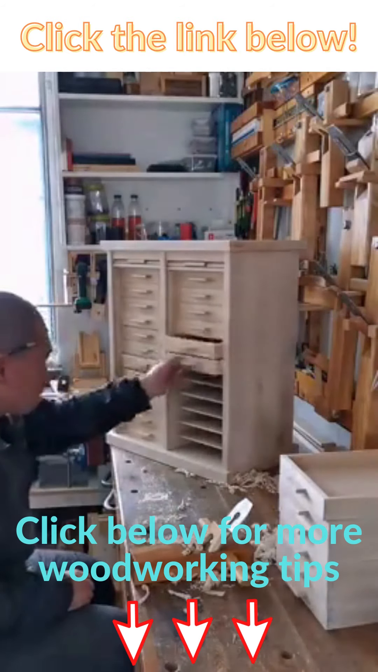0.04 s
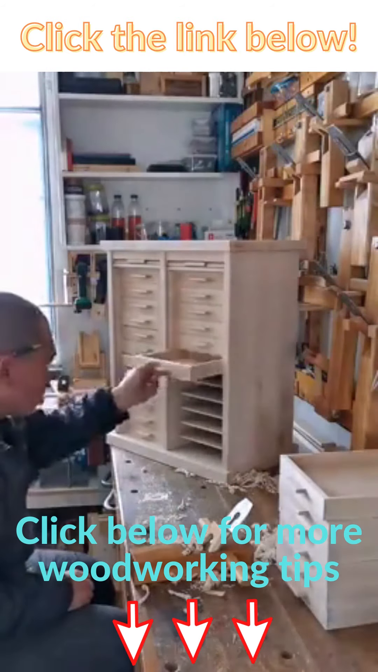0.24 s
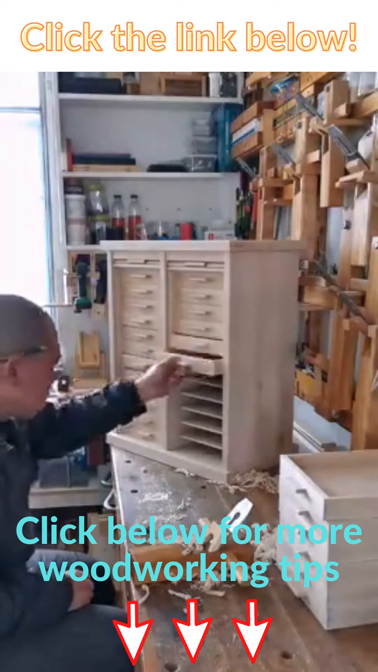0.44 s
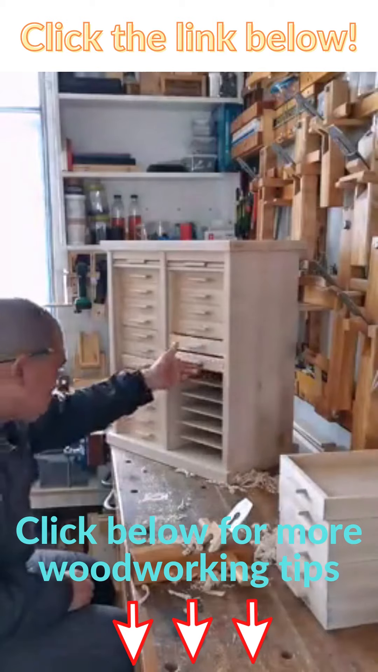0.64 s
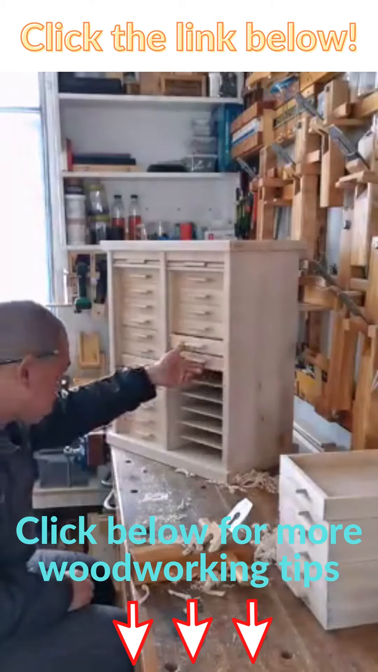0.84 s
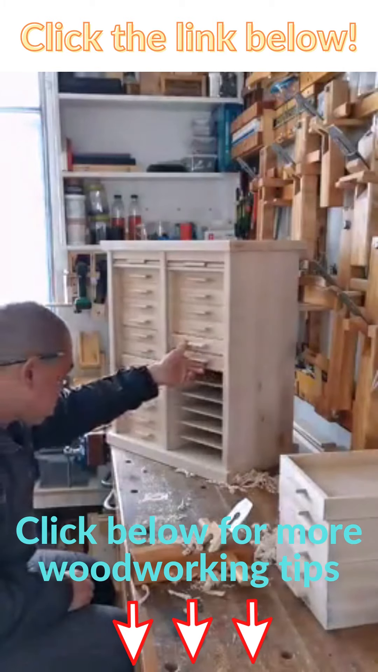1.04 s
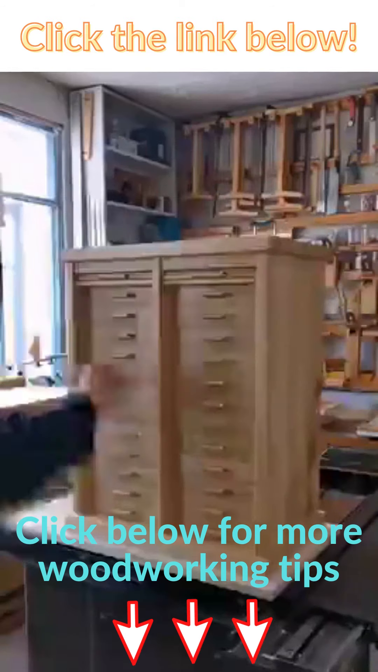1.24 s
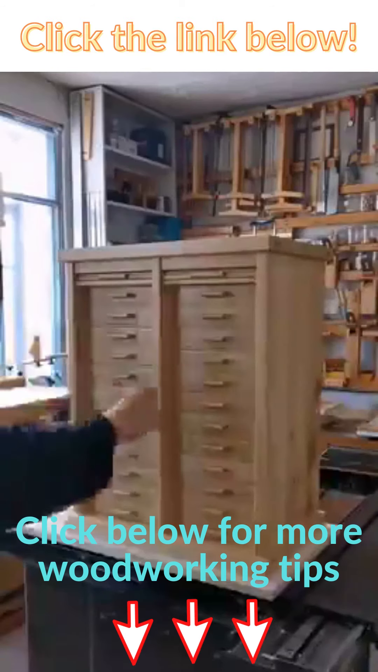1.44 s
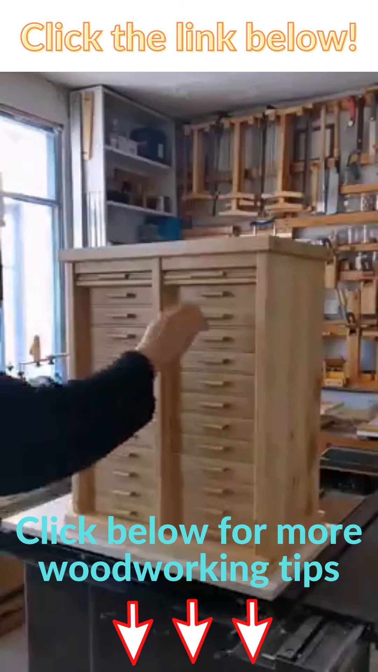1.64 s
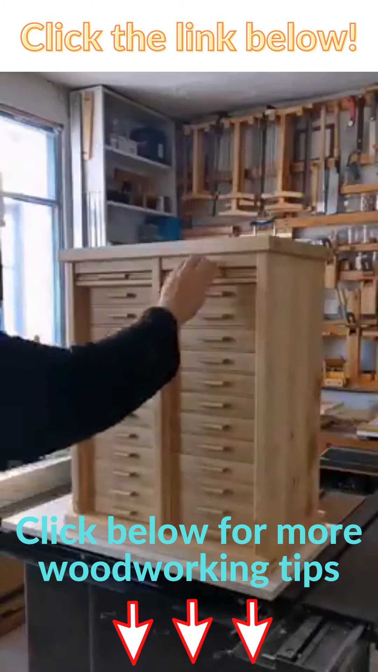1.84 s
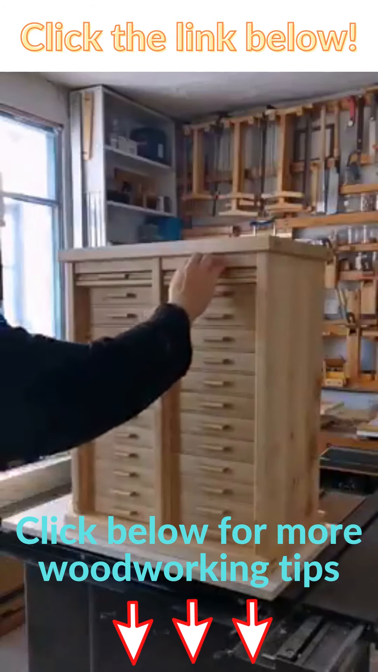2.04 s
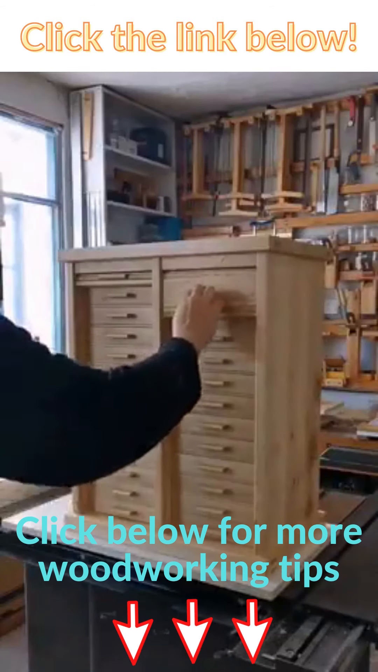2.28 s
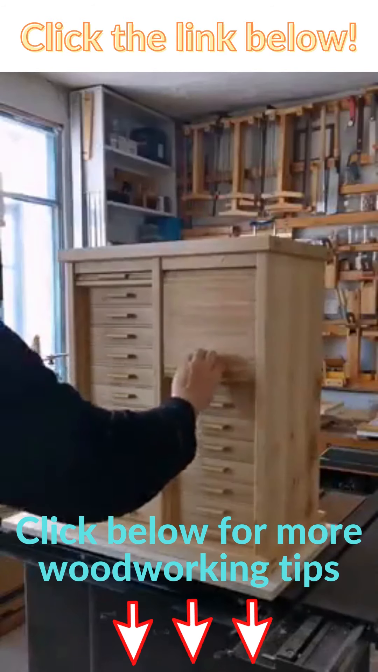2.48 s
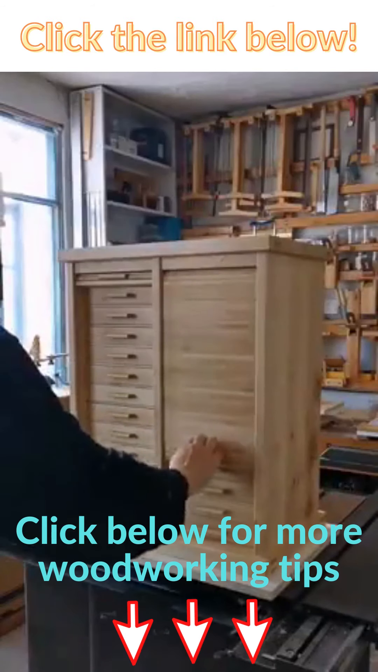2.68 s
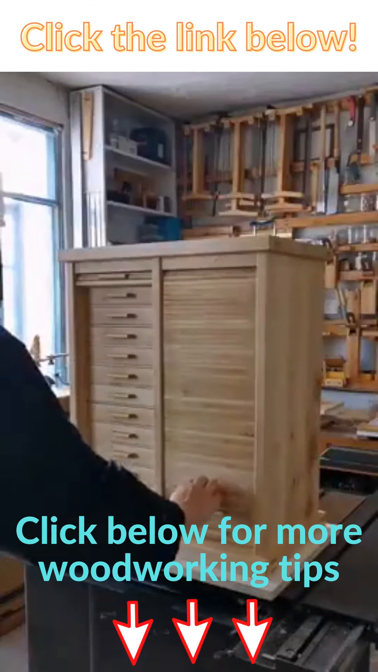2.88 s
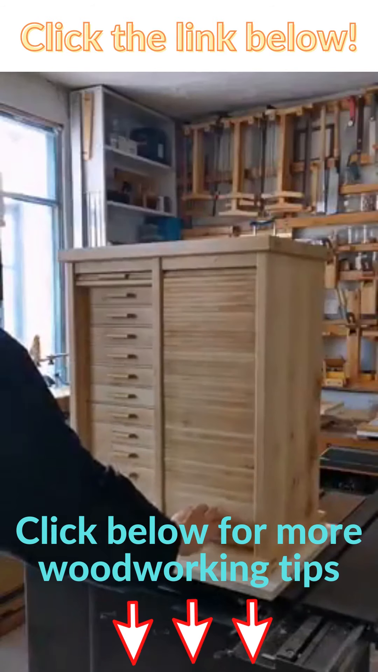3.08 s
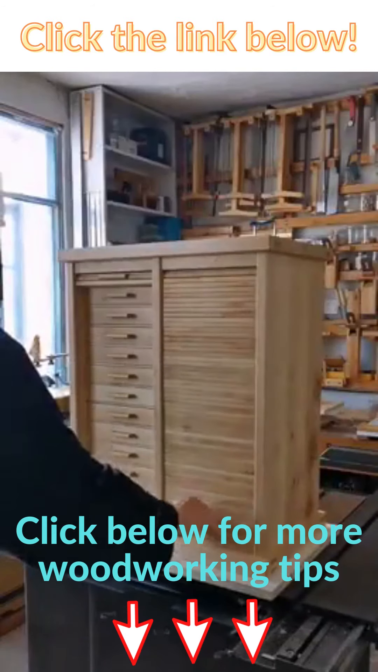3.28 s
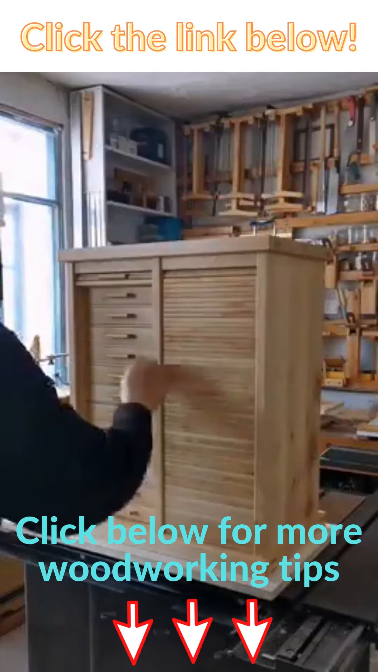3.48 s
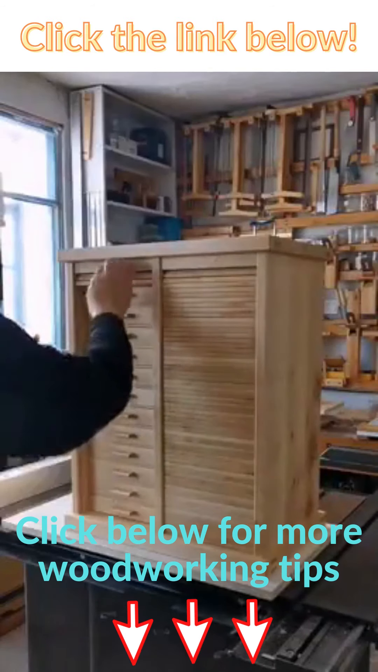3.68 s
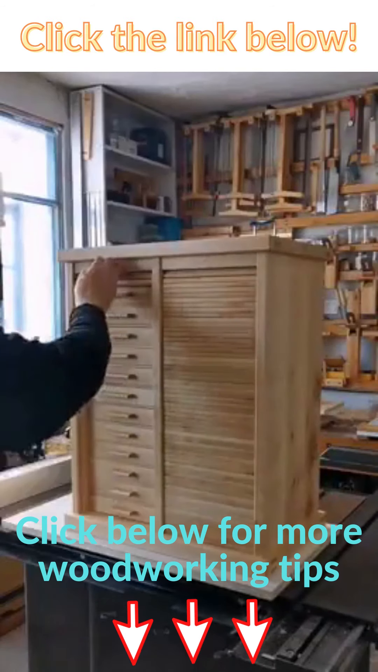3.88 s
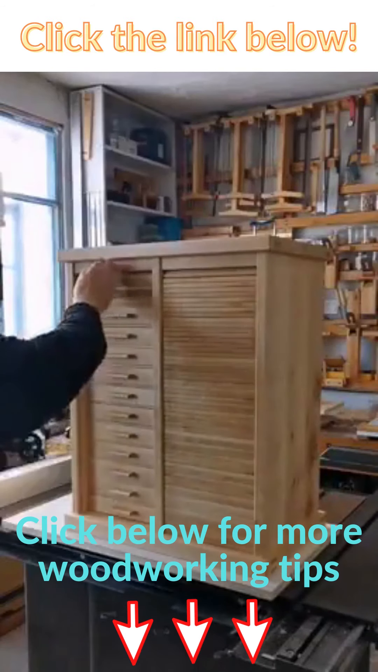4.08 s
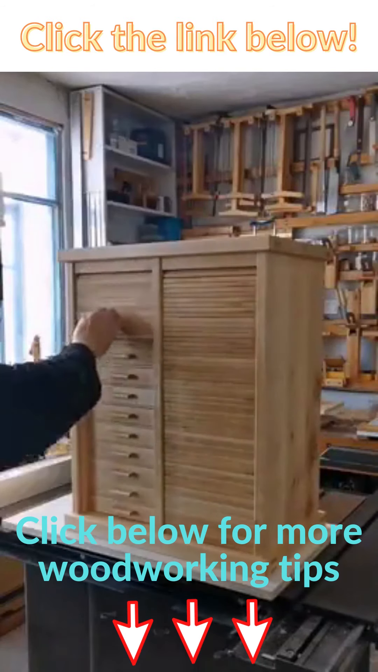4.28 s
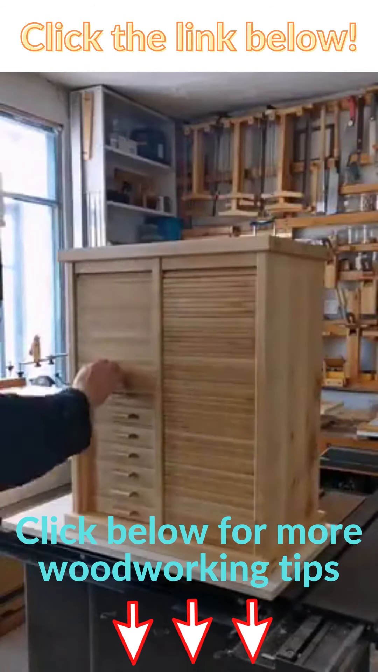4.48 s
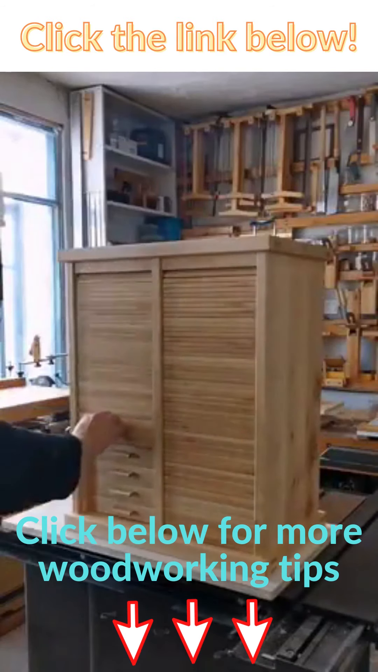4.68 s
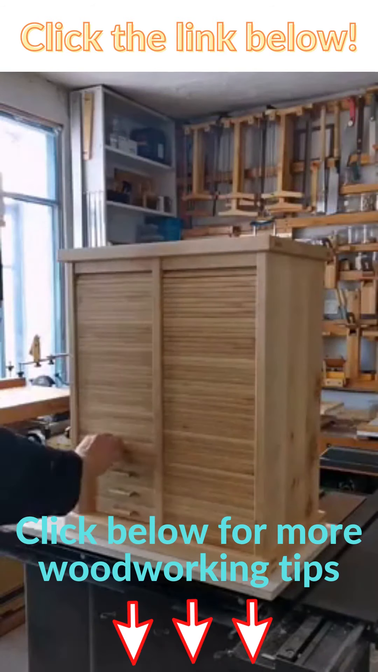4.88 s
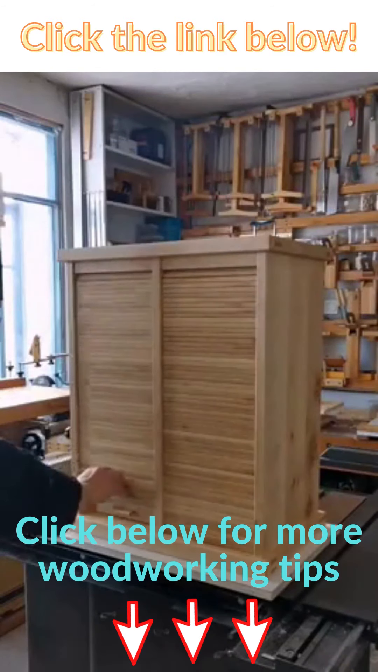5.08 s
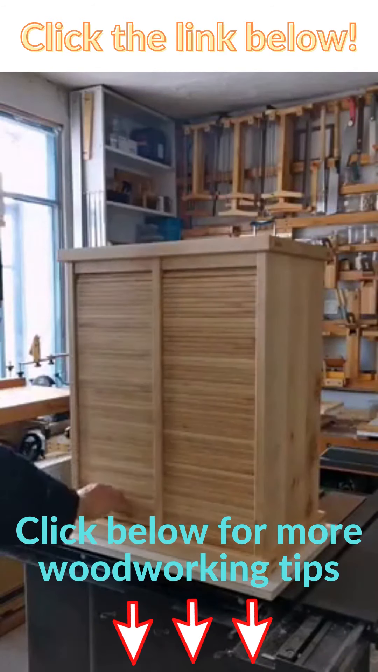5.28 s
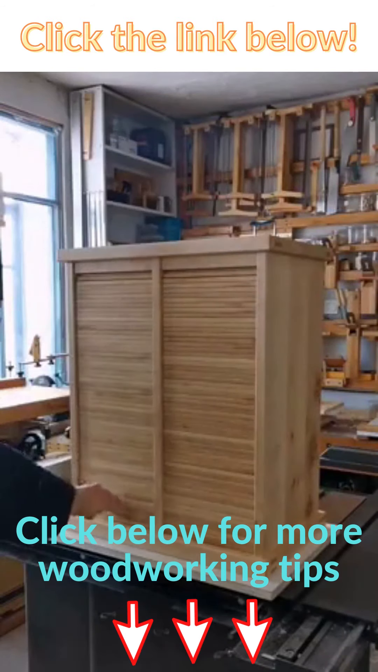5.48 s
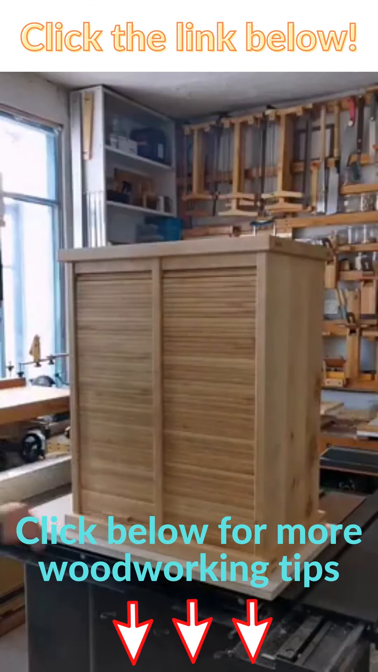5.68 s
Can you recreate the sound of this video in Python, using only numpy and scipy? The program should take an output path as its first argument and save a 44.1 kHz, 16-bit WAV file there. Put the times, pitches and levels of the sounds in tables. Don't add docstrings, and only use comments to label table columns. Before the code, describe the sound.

A small wooden tray scrapes in and knocks home, then two slatted wooden shutters rattle down their grooves, each ending in a clack.

```python
import sys
import numpy as np
from scipy import signal
from scipy.fft import rfft, irfft, next_fast_len
from scipy.io import wavfile
from scipy.ndimage import uniform_filter1d

SR = 44100
rng = np.random.default_rng(int(sys.argv[2]) if len(sys.argv) > 2 else 0)


def field_ratio(decibels):
    return 10 ** (np.asarray(decibels, dtype=float) / 20)


def to_wav(s):
    ch = np.atleast_2d(s).T
    pcm = np.round(np.clip(ch, -1, 1) * 32767)
    wavfile.write(sys.argv[1], SR, pcm.astype(np.int16))


N = 252693
FULL_SPEED_DB = -22
BOX_LOW_HZ = 112

# frequency in Hz, width in Hz, level in dB.
BOX_MODES = [(152.8, 68, 0.5), (200, 60.2, 2.5), (250, 61, -3), (315, 73, -7)]
PANEL_MODES = [(412, 76, -1.5), (531, 96, -3), (660, 130, -5), (830, 180, -6), (970, 66, -2),
               (1150, 200, -6)]
TRAY_MODES = [(400, 44, 2), (560, 80, -0.5), (720, 94, 0), (900, 88, -0.5), (1010, 70, -2), (1180, 200, -6)]
# frequency in Hz, level in dB per Hz.
RASP_SPECTRUM = [(700, -13.5), (1200, -5), (1500, 0.5), (2300, -1), (3300, -1), (3900, -9), (4600, -46)]
HISS_SPECTRUM = [(2240, -24.5), (3800, -8.5), (4700, -9), (5100, -7.5), (6810, -2.5), (7440, -5.5),
                 (7900, -17), (10600, -23.5), (11600, -28), (13000, -24.5), (15600, -46)]


def strokes():
    boom_db, knock_db, rasp_db, hiss_db = motion()
    boom = field_ratio(boom_db) * friction(150, spread_db=10.5, smooth=1.0, response=modes(BOX_MODES))
    tray_boom = filtered(boom, above(190))
    box_boom = filtered(boom, above(BOX_LOW_HZ))
    boom = np.where(first_take(), tray_boom, box_boom) * field_ratio(3.5)
    tray = friction(250, spread_db=14.0, smooth=0.91, response=modes(TRAY_MODES))
    slats = friction(250, spread_db=11.5, smooth=1.0, response=modes(PANEL_MODES))
    knock = field_ratio(knock_db) * np.where(first_take(), tray, slats)
    rasp = field_ratio(rasp_db) * friction(600, spread_db=11.5, smooth=1.0, response=shape(RASP_SPECTRUM))
    hiss = field_ratio(hiss_db) * friction(1500, spread_db=4.5, smooth=1.0, response=shape(HISS_SPECTRUM))
    near = shifting(boom + knock + rasp + hiss, depth_db=2.12)
    shop = signal.fftconvolve(near, spread(*tail(.4, 1)), axes=1)[:, :N]
    return near + field_ratio(-9.5) * shop


# time in seconds, speed as rasp level in dB, weight on the runners in dB.
TRAY_OUT = [
    (0.0, -28, -5.5),
    (0.074, -33, 2.5),
    (0.136, -27, -9),
    (0.19, -31, -9),
    (0.245, -42.5, 12),
]
TRAY_IN = [
    (0.262, -41, 13),
    (0.269, -32, 1.5),
    (0.376, -29.5, 0),
    (0.422, -29, 9.5),
    (0.55, -43, 12.5),
]
TRAY_SEATS = [
    (0.57, -38, 2),
    (0.608, -40, 1.5),
    (0.99, -53, 4.5),
    (1.106, -47.5, -0.5),
    (1.178, -45, -1),
    (1.201, -45, 5),
]
# time in seconds, speed as rasp level in dB, weight in the grooves in dB.
RIGHT_RUN = [
    (2.329, -40, -36),
    (2.346, -47.5, -5),
    (2.389, -34, -4.5),
    (2.514, -24, -11),
    (2.564, -21.5, -6.5),
    (2.848, -20, -2.5),
    (2.912, -23.5, 3),
    (3.06, -37, 3),
]
RIGHT_CREEP = [
    (3.09, -38.5, -0.5),
    (3.174, -35.5, -2.5),
    (3.278, -36.5, 6),
    (3.367, -40.5, 5.5),
]
LEFT_RUN = [
    (4.31, -46.5, -21),
    (4.339, -37.5, -11),
    (4.348, -30, -13.5),
    (4.474, -24, -6.5),
    (4.626, -25.5, -1.5),
    (4.636, -26.5, -1.5),
    (4.844, -27, 2.5),
    (4.878, -35, 8.5),
    (4.96, -39.5, -2.5),
]
LEFT_CREEP = [
    (5.0, -39.5, -2.5),
    (5.054, -39, -2.5),
    (5.15, -38, 5),
    (5.31, -37.5, 1),
    (5.564, -50, 0),
    (5.57, -43, -0.5),
]
# start in seconds, end in seconds.
RUNS = [
    (2.45, 3.1),
    (4.35, 5.8),
]


def motion():
    tray = TRAY_OUT + TRAY_IN + TRAY_SEATS
    speed_db, weight_db = curves([tray, RIGHT_RUN + RIGHT_CREEP, LEFT_RUN + LEFT_CREEP])
    t = np.arange(N) / SR
    slats_out_db, let_go_s = 3.5, 0.0098
    out = sum(np.interp(t, [a - let_go_s, a, b, b + let_go_s], [-0.0013, 0.18, 0.77, 0.25]) for a, b in RUNS)
    load_db = speed_db + np.maximum(weight_db, -40)
    boom_db = load_db - 4.5 - .5 * slats_out_db * out
    rattle_db = load_db + np.where(first_take(), -5.5, -6.5) + slats_out_db * out
    rasp_db = speed_db - 2.5
    hiss_grows = 1
    hiss_db = FULL_SPEED_DB + hiss_grows * (speed_db - FULL_SPEED_DB) - 3.5
    return boom_db, rattle_db, rasp_db, hiss_db


# time in seconds, peak in dB, pitch in Hz.
BUMPS = [(0.086, -20, 228), (0.129, -18.5, 200.0), (0.229, -25, 246), (0.272, -28, 208), (0.296, -23, 219),
         (0.388, -14.5, 226), (0.424, -21, 300.0), (0.451, -30, 250.0), (0.513, -43, 315),
         (0.527, -44, 288), (0.558, -36, 266), (0.572, -24, 228), (0.72, -24.5, 217), (1.085, -31.5, 200),
         (2.43, -30.5, 280), (2.451, -40, 240.0), (2.565, -13.5, 310.1), (2.579, -11, 235),
         (2.625, -10, 218), (2.677, -17, 208), (2.73, -14, 237), (2.761, -22, 190.0), (2.793, -22, 258),
         (2.831, -17.5, 232), (2.886, -21, 223), (2.907, -9, 228), (2.934, -9, 247), (3.038, -17.5, 234),
         (3.121, -31, 190.0), (3.211, -28, 310.0), (3.245, -43, 230.0), (3.28, -30, 295),
         (3.318, -21.5, 300), (4.37, -24, 242), (4.392, -24, 270), (4.422, -22, 190.0), (4.475, -23.5, 237),
         (4.496, -22, 232), (4.51, -27, 206), (4.633, -19, 200.0), (4.646, -18.5, 279), (4.664, -18, 171),
         (4.708, -22.5, 202), (4.767, -14, 220), (4.781, -14.5, 184), (4.845, -21, 323), (4.86, -32, 212),
         (4.874, -14.5, 194), (4.928, -26, 182), (4.995, -26.5, 193), (5.086, -23, 316),
         (5.105, -21.5, 224), (5.128, -24, 255), (5.152, -21, 248), (5.165, -18.5, 201),
         (5.275, -24.5, 245), (5.333, -27, 280), (5.358, -39, 280.0), (5.432, -28, 310), (5.466, -42, 337)]
# time in seconds, peak in dB, pitch in Hz.
TICKS = [(0.061, -26, 895), (0.087, -16.5, 650), (0.109, -18.5, 720), (0.136, -21, 820), (0.161, -22, 750),
         (0.27, -17, 1110), (0.284, -16.5, 1010.0), (0.409, -17, 910), (0.421, -8.5, 930.0),
         (0.437, -28, 860), (0.463, -18, 854), (0.486, -15, 760.0), (0.508, -18.5, 720), (0.524, -18, 790),
         (0.556, -19.5, 810), (0.651, -27, 590), (0.662, -28, 760), (0.72, -23.5, 794), (0.743, -28, 680),
         (2.429, -28, 1050), (2.547, -24, 1150), (2.569, -27, 1050), (2.596, -35, 1010.0),
         (2.616, -14, 1210.0), (2.655, -18, 1090), (2.673, -9, 970), (2.688, -12, 906), (2.774, -25, 830.0),
         (2.783, -16, 740), (2.805, -10.5, 620), (2.869, -10.5, 910), (2.883, -24, 696), (2.9, -28, 710),
         (3.002, -23, 764), (3.102, -25, 1270), (3.177, -27, 1150), (3.199, -28, 680), (3.236, -43, 1010.0),
         (3.246, -20.5, 1180), (3.297, -23, 1200), (4.361, -37, 745), (4.384, -36, 810), (4.427, -34, 1130),
         (4.477, -39, 950), (4.487, -20, 1060), (4.515, -16, 1060), (4.59, -11, 1130), (4.6, -17, 1060),
         (4.658, -19, 890), (4.668, -17, 970), (4.813, -14, 830), (4.837, -18, 630), (5.118, -30, 750),
         (5.171, -41, 660), (5.207, -28, 670), (5.304, -26, 830), (5.342, -40, 720.0), (5.355, -27, 830.0),
         (5.433, -31, 585), (5.467, -30.5, 487)]
# time in seconds, peak in dB, pitch in Hz.
CLICKS = [(0.036, -28.5, 2430.0), (0.113, -18, 2420), (0.127, -20, 2450), (0.134, -20, 2420),
          (0.151, -30.5, 2640), (0.158, -33, 2440.0), (0.21, -18, 2600), (0.268, -14, 2100),
          (0.281, -14, 2090), (0.288, -29.5, 2250.0), (0.335, -22, 2330), (0.411, -12, 2290),
          (0.425, -21, 2020), (0.431, -28, 2220.0), (0.438, -28, 2030), (0.459, -20, 2050.0),
          (0.525, -32, 2320), (2.178, -42, 1940), (2.186, -24, 1870), (2.193, -42, 2220.0),
          (2.2, -39, 2090), (2.264, -26, 2480.0), (2.503, -10, 2550.0), (2.525, -15, 2290),
          (2.534, -14, 2570), (2.543, -18, 2240.0), (2.564, -17, 2670), (2.645, -30, 2200),
          (2.659, -29, 2290.0), (2.702, -21, 2370.0), (2.768, -25, 2640.0), (2.846, -10, 2380.0),
          (2.867, -22, 2440), (2.933, -11, 2500), (2.987, -32, 2180), (3.122, -37, 2120.0),
          (3.274, -41, 2300.0), (3.282, -33, 2030), (3.982, -37, 2780.0), (3.992, -42, 2620.0),
          (4.005, -38, 2080), (4.046, -35, 2250), (4.185, -42, 2630), (4.217, -49.5, 2210),
          (4.347, -17, 2910), (4.359, -11, 2700), (4.371, -17, 2620), (4.489, -14, 2650),
          (4.515, -20.5, 2360), (4.525, -20, 2520), (4.574, -27, 2440), (4.583, -27, 2440),
          (4.617, -13, 2500), (4.668, -29, 2480), (4.703, -27, 2630), (4.753, -24, 2520),
          (4.783, -17, 2620), (4.831, -13.5, 1970), (4.841, -15, 2230.0), (4.972, -30, 2380.0)]
# time in seconds, peak in dB, pitch in Hz.
RINGS = [(1.217, -22, 800), (1.224, -43, 620), (1.238, -29, 880), (1.256, -29, 790), (1.275, -37, 800),
         (1.3, -51, 600), (3.384, -11, 940), (3.387, -12, 394), (3.394, -10.5, 435), (3.402, -18, 623.5),
         (3.412, -33, 480), (3.423, -21, 2020), (3.44, -19, 480), (3.462, -22, 705), (5.587, -15.5, 857),
         (5.593, -11, 624), (5.608, -19, 720), (5.622, -27, 517), (5.628, -21.5, 415), (5.645, -31, 535),
         (5.659, -38, 563), (5.671, -32, 472)]
# time in seconds, peak in dB, pitch in Hz.
NAILS = [
    (2.175, -28.5, 6800),
    (2.265, -35, 6900),
    (2.329, -44, 7000),
    (3.971, -42, 6800),
    (4.185, -50, 7000),
]


def catches():
    slides = (jolts(BUMPS, cycles=0.91, over_db=-5.5) + jolts(TICKS, cycles=1.16, over_db=-4.5)
              + jolts(CLICKS, cycles=1.13, over_db=-4))
    stops = jolts(RINGS, cycles=1.24, over_db=-5) + jolts(NAILS, cycles=3.9, over_db=-1)
    direct = filtered(slides + stops, above(BOX_LOW_HZ))
    near, walls = signal.fftconvolve(direct[None], tail(0.34, 1.68), axes=1)[:, :N]
    return spread(0.88 * direct + 0.51 * near, 0.71 * walls)


def jolts(table, cycles, over_db):
    out = np.zeros(N + SR)
    t = np.arange(SR // 20) / SR
    for s, db, hz in table:
        u = t * hz / cycles
        ring = u * np.exp(1 - u) * np.sin(2 * np.pi * (hz * t + rng.random()))
        out[round(s * SR):][:len(t)] += field_ratio(db + over_db) * ring
    return out[:N]


# time in seconds, peak in dB, boom in dB, boom pitch in Hz, hardness (edge crack) in dB.
KNOCKS = [(0.086, -33.5, 3, 207, -14), (0.264, -39, 0, 179, 13), (0.409, -32, -8, 263, -4),
          (0.424, -18.5, -8, 277, -5.5), (0.439, -32, -9, 224, 3), (1.087, -55, 12, 190, -6),
          (1.217, -30, 7, 253, -14), (1.299, -49, 10, 287, -14), (2.173, -59, 6, 308, 15),
          (2.264, -61, 9, 263, 22), (3.381, -25, -1, 296, 1.5), (3.385, -20.5, 3.5, 334, -6.5),
          (3.404, -28, -4, 600, -16), (3.414, -25.5, 5, 155, -8), (4.185, -74, 0, 195, 7),
          (4.315, -68, -5, 232, 6), (4.345, -40.5, 6.5, 243, -6), (5.468, -49, -11, 186, -12),
          (5.587, -21.5, -2, 750, -3.5), (5.593, -28, -3, 590, 1), (5.596, -25.5, -0.5, 175, -3.5),
          (5.627, -36.5, -3, 204, 2), (5.645, -33, -25, 310, -10)]
# frequency in Hz, width in Hz, level in dB.
SILL_MODES = [(279, 38, 7.5), (422, 54, 5.5), (508, 60, 8), (695, 107, -0.5), (887, 160, 0),
              (1250, 930, -14)]


def knocks():
    out = np.zeros((2, N + SR))
    t = np.arange(SR // 2) / SR
    t60_s = np.array([[.13], [.11], [.12], [.04]])
    rise_s = np.array([[.0004], [.0006], [.003], [.0006]])
    snap_db, snap_top_hz = 0.5, 8150
    blow_top_hz = 6640
    for s, db, boom_db, boom_hz, edge_db in KNOCKS:
        shake = rng.standard_normal((4, len(t))) * field_ratio(-60 * t / t60_s) * (1 - np.exp(-t / rise_s))
        shake[:2, :40] += .45
        bodies = (modes(SILL_MODES), modes([(boom_hz, 0.38 * boom_hz, 0)]), shape(RASP_SPECTRUM),
                  lambda f: shape(HISS_SPECTRUM)(f) / (1 + (f / snap_top_hz) ** 4))
        parts = [filtered(x, body) for x, body in zip(shake, bodies)]
        rel_levels = (0, boom_db + 0.5, edge_db, edge_db + snap_db)
        blow = sum(field_ratio(db + rel_db) * p / np.abs(p).max() for p, rel_db in zip(parts, rel_levels))
        blow = filtered(blow, lambda f: 1 / (1 + 1j * f / blow_top_hz) ** 2)
        wet = signal.fftconvolve(blow[None], spread(*tail(0.22, 1.26)), axes=1)[:, :len(t)]
        out[:, round(s * SR):][:, :len(t)] += blow + wet
    return out[:, :N]


# time in seconds, level in dB, brightness in dB.
TUGS = [
    [(2.17, -46, -12), (2.176, -36, -12), (2.192, -35.5, -25.5), (2.255, -42.5, -15), (2.266, -46, -7),
     (2.31, -49, -25), (2.324, -49, -6), (2.332, -42, -21), (2.36, -42.5, -6)],
    [(3.966, -62, 0), (3.971, -45, -13), (3.99, -39.5, -18), (4.055, -40.5, -9), (4.153, -49, -9),
     (4.171, -62, -5), (4.181, -47.5, -6), (4.3, -66, -5)],
]
# frequency in Hz, width in Hz, level in dB.
RIGHT_LIP_MODES = [(898, 310, 1.5), (1460, 490, 4), (2200, 350, 4), (3280, 520, 0), (5000, 380, -1.5),
                   (6450, 700, -10)]
LEFT_LIP_MODES = [(930, 220, 0), (1400, 300, 4.5), (2230, 340, 3.5), (3405, 350, 2.5), (4840, 470, -1),
                  (6930, 390, -5.5)]


def tugs():
    level_db, bright_db = curves(TUGS)

    def lip(table):
        body = lambda f: modes(table)(f) ** 2 * f ** 2 / (f ** 2 + 750 ** 2)
        return friction(500, spread_db=4.0, smooth=0.58, response=body)

    chatter = np.where(np.arange(N) < 3 * SR, lip(RIGHT_LIP_MODES), lip(LEFT_LIP_MODES))
    dust = friction(1500, spread_db=-5, smooth=0.72, response=shape(HISS_SPECTRUM))
    return field_ratio(level_db) * (shifting(chatter, depth_db=2.5) + field_ratio(bright_db) * dust)


# start in seconds, end
# in seconds, pitch in Hz, width in Hz, rms in dB.
SINGS = [(.52, 0.88, 830, 120, -48.5), (1.14, 1.2, 2200, 500, -48.5), (1.23, 1.317, 780, 300, -49),
         (1.47, 1.71, 6600, 1500, -56.5), (2.96, 3.09, 192, 70, -35), (3.13, 3.45, 1096, 100, -46.5),
         (3.15, 3.5, 1360, 150, -48), (3.33, 3.33, 1260, 300, -38), (3.405, 3.4, 150, 51, -23),
         (2.76, 2.96, 570, 370, -31), (4.54, 4.75, 1130, 220, -34), (4.78, 4.891, 483, 105, -30.5),
         (4.8, 4.83, 1060, 150, -25), (5.05, 5.104, 1260, 120, -45.5), (4.18, 4.26, 2190, 180, -55),
         (.415, 0.484, 1280, 600, -29), (5.21, 5.29, 212, 98, -38), (2.32, 2.35, 1340, 150, -43),
         (1.22, 1.28, 258, 120, -32)]


def sings():
    out = np.zeros((2, N + SR))
    edge_s = .03
    for a, b, hz, width, db in SINGS:
        t = np.arange(round((b - a + edge_s) * SR)) / SR
        rub = filtered(rng.standard_normal((2, SR)), lambda f: modes([(hz, width, 0)])(f) ** 2)
        fade = np.clip(np.minimum(t, t[-1] - t) / edge_s, 0, 1)
        out[:, round((a - edge_s / 2) * SR):][:, :len(t)] += field_ratio(db) * fade * unit(rub)[:, :len(t)]
    return spread(*out[:, :N])


# frequency in Hz, level in dB per Hz.
SHUDDER_SPECTRUM = [(15, -18), (32, -1), (45, 1), (70, -2.5), (100, 1.5), (140, -67)]
# time in seconds, half length in seconds, level in dB.
SHOVES = [
    (.43, 0.043, -53),
    (2.68, 0.12, -46.5),
    (2.835, 0.029, -37.5),
    (3.273, 0.026, -44.5),
    (4.613, 0.14, -41.5),
    (5.32, 0.08, -44),
]


def bench():
    t = np.arange(N) / SR
    hum_s, hold_s, fade_db_per_s = 3.45, 0.29, 177
    hum_db = -49.5 - fade_db_per_s * np.maximum(t - hum_s - hold_s, 0)
    hum = field_ratio(hum_db) * np.clip((t - hum_s) / .02, 0, 1) * np.sin(2 * np.pi * 106 * t)
    shake_db = FULL_SPEED_DB + 1.34 * (motion()[0] - FULL_SPEED_DB) - 14
    thump_db, thump_t60_s = -33, 0.38
    thumps = sum(field_ratio(db + thump_db - 60 * np.abs(t - s) / thump_t60_s) * (t > s) for s, db, *_ in KNOCKS)
    shoves = sum(field_ratio(db) * np.exp(-((t - s) / half) ** 4) for s, half, db in SHOVES)
    moving = (field_ratio(shake_db) + thumps) * field_ratio(-16 * first_take()) + shoves
    rumble = unit(filtered(spread(*rng.standard_normal((2, N))), shape(SHUDDER_SPECTRUM)))
    rest_db = -59.5
    return hum + (field_ratio(rest_db) + moving) * rumble


# frequency in Hz, level in dB per Hz.
AIR_SPECTRUM = [(59, -51), (110, -10), (230, -13.5), (800, -20), (3900, -24), (6970, -24), (8610, -36),
                (13700, -32.5)]
# time in seconds, level in dB.
AIR_LEVEL = [(0, -39.5), (1.0, -54.5), (1.4, -52), (2.2, -53), (3.6, -56.5), (5.73, -56.5)]


def air():
    s, db = np.transpose(AIR_LEVEL)
    noise = filtered(spread(*rng.standard_normal((2, N))), shape(AIR_SPECTRUM))
    return field_ratio(np.interp(np.arange(N) / SR, s, db)) * unit(noise)


def friction(rate, spread_db, smooth, response):
    hits = rng.random(N) < rate / SR
    bumps = unit(hits * field_ratio(spread_db * rng.random(N)) * rng.choice([-1, 1], N))
    near, walls = signal.fftconvolve(bumps[None], tail(.12, 5), axes=1)[:, :N]
    rub = smooth * rng.standard_normal((2, N))
    shared = 0.78 * bumps + 0.66 * near + rub[0]
    opposed = 0.86 * walls + rub[1]
    return unit(filtered(spread(shared, opposed), response))


def shifting(x, depth_db):
    z = signal.stft(x, nperseg=1024)[2]
    field = uniform_filter1d(rng.standard_normal(z.shape[1:]), size=4, axis=0)
    field = uniform_filter1d(field, size=8, axis=1)
    return signal.istft(z * field_ratio(depth_db * unit(field) - 1.5), nperseg=1024)[1][:, :N]


# frequency in Hz, t60 in seconds.
SHOP_T60 = [(150, 0.55), (600, 0.52), (2500, 0.53), (7000, 0.43), (12000, 0.12)]


def tail(seconds, faster):
    hz, t, z = signal.stft(rng.standard_normal((2, int(seconds * SR))), SR, nperseg=256)
    decay = field_ratio(-60 * faster * t / along(SHOP_T60, hz)[:, None])
    h = signal.istft(z * decay, SR, nperseg=256)[1]
    return h / np.linalg.norm(h[0])


# frequency in Hz, left-right correlation.
ALIKE = [(60, 0.76), (150, 0.91), (350, 0.72), (700, 0.18), (1400, 0.1), (2900, -0.073), (4300, -0.37),
         (6500, 0.83), (9000, 0.85), (13000, 0.45)]


def spread(a, b):
    turn = lambda hz: np.arccos(np.clip(along(ALIKE, hz), -1, 1)) / 2
    mid = filtered(a, lambda hz: np.cos(turn(hz)))
    side = filtered(b, lambda hz: np.sin(turn(hz)))
    return np.array([mid + side, mid - side])


def modes(table):
    def response(f):
        return sum((-1) ** k * field_ratio(db) * 1j * f * width / (hz * hz - f * f + 1j * f * width)
                   for k, (hz, width, db) in enumerate(table))
    return response


def shape(points):
    return lambda f: field_ratio(along(points, f))


def above(low_hz):
    def response(f):
        first = (1j * f / (low_hz + 1j * f)) ** 2
        return first * -f * f / (low_hz ** 2 - f * f + 1j * f * low_hz)
    return response


def filtered(x, response):
    n = x.shape[-1]
    m = next_fast_len(n + 8192)
    return irfft(rfft(x, m) * response(np.fft.rfftfreq(m, 1 / SR)), m)[..., :n]


def along(points, hz):
    f, v = np.transpose(points)
    return np.interp(np.log(hz + 1), np.log(f + 1), v)


def unit(x):
    return x / np.sqrt(np.mean(x ** 2) + 1e-20)


def curves(spans):
    off = [-120] * (len(spans[0][0]) - 1)
    rows = []
    for span in spans:
        first, last = span[0], span[-1]
        rows.append((first[0] - .004, *off))
        rows += list(span)
        rows += [(last[0] + .014, *last[1:]), (last[0] + .08, *off)]
    s, *cols = np.transpose(rows)
    return [np.interp(np.arange(N) / SR, s, c) for c in cols]


# time in seconds, level in dB.
CUT = [
    (0, 1.5),
    (1.385, -5),
    (1.4, -14),
    (1.415, -35),
    (1.43, -30),
    (1.445, -21),
    (1.461, -1.5),
    (5.73, 6),
]


def first_take():
    return np.arange(N) < CUT[2][0] * SR


# frequency in Hz, margin in standard deviations.
DROPS = [(1500, 3.5), (3300, 2.2), (3700, .4), (4200, .4), (4900, .9), (5500, 1.4), (7200, 1.6), (7700, 0),
         (8200, 1.2), (11000, .9), (11700, -.2), (12400, 1), (13500, .7), (14300, .2), (15000, -1),
         (15700, -3)]


def thrifty(x, sharpen, flutter_db):
    hz, _, z = signal.stft(x, SR, nperseg=2048, noverlap=1536)

    def smooth(v, size):
        return uniform_filter1d(uniform_filter1d(v, size=size[0], axis=0), size=size[1], axis=1)

    power = np.abs(z.mean(0)) ** 2 + 1e-20
    narrow = np.abs(smooth(power, size=(9, 5))) + 1e-20
    valley = np.log10(narrow / np.abs(smooth(power, size=(60, 5))))
    bands = smooth(rng.standard_normal(power.shape), size=(1, 8))[::10]
    chance = unit(smooth(np.repeat(bands, 10, axis=0)[:len(hz)], size=(3, 2)))
    margin = chance + valley + along(DROPS, hz)[:, None]
    keep = 1 / (1 + np.exp(-np.clip(9 * margin, -6, 9)))
    waver = unit(smooth(rng.standard_normal(power.shape), size=(150, 3)))
    flutter = field_ratio(flutter_db * waver * (hz[:, None] > 7700))
    z = z * keep * flutter * (power / narrow) ** sharpen
    return signal.istft(z, SR, nperseg=2048, noverlap=1536)[1][:, :N]


# frequency in Hz, level in dB against the hiss.
WHISTLES = [(13609, -31), (14643, -36), (15677, -40)]


def whistles():
    t = np.arange(N) / SR
    tones = sum(field_ratio(db) * np.sin(2 * np.pi * hz * t) for hz, db in WHISTLES)
    on = np.repeat(rng.random(N // 2048 + 1) < .5, 2048)[:N] * 1.
    return field_ratio(2 * motion()[3] - FULL_SPEED_DB) * tones * uniform_filter1d(on, size=600)


def scene():
    return strokes() + catches() + tugs() + knocks() + bench() + air() + sings()


def top_cut(x):
    return signal.sosfilt(signal.butter(12, 15710, fs=SR, output="sos"), x)


# frequency in Hz, left minus right in dB.
TILT = [(60, 3), (180, 1.5), (550, 2), (1650, 0), (4970, -0.5), (9000, -2), (14000, -2.5)]


def record(dry):
    ports = filtered(dry, lambda hz: field_ratio(along(TILT, hz) * np.array([[.5], [-.5]])))
    thinned = thrifty(ports, sharpen=0.08, flutter_db=4.0) + whistles()
    s, db = np.transpose(CUT)
    faded = thinned * field_ratio(np.interp(np.arange(N) / SR, s, db))
    return top_cut(faded)


dry = scene()
out = record(dry)
to_wav(out)
```